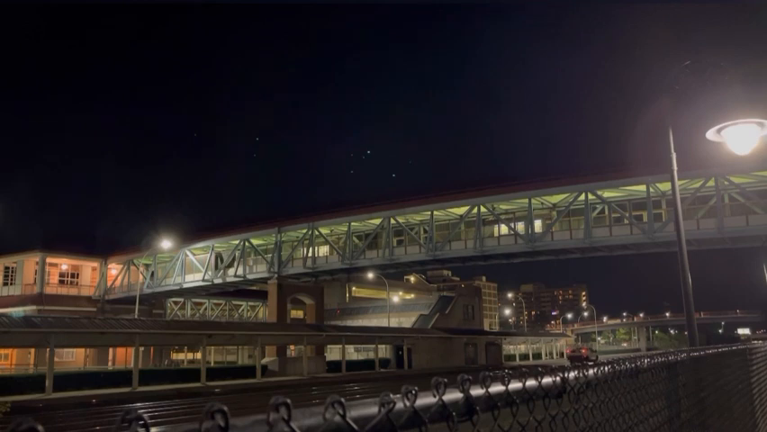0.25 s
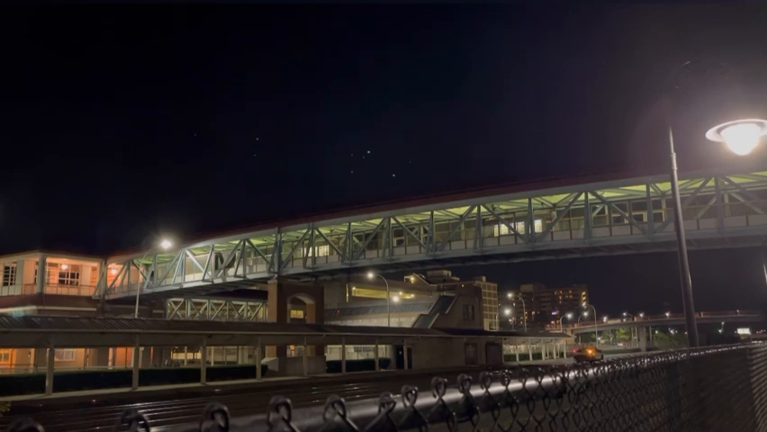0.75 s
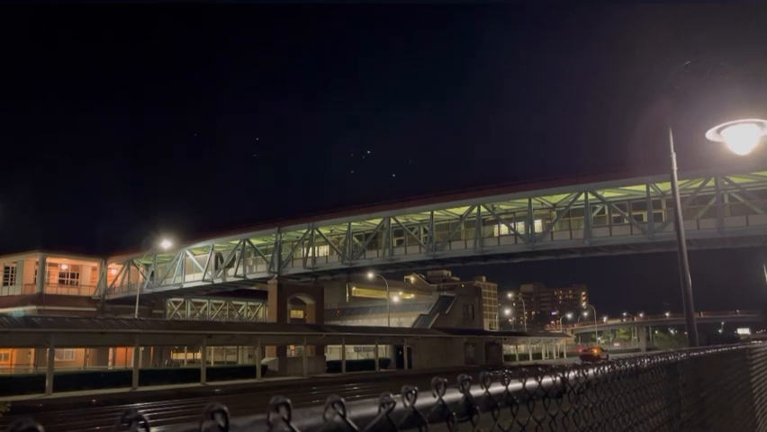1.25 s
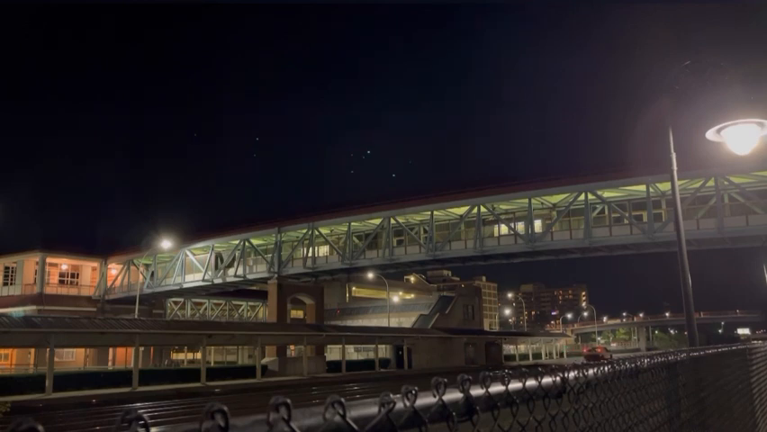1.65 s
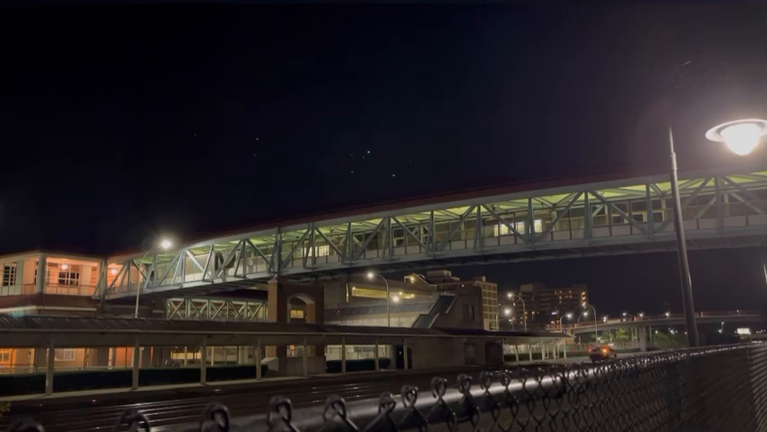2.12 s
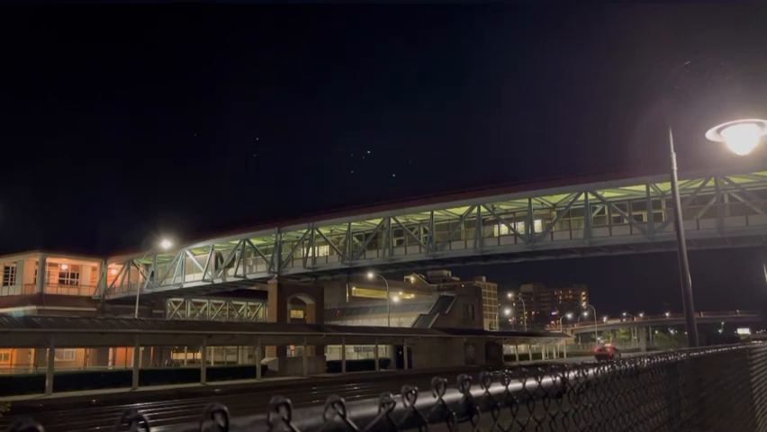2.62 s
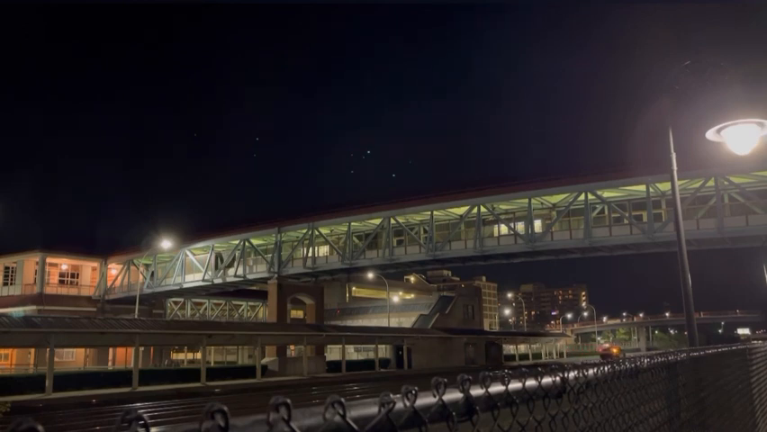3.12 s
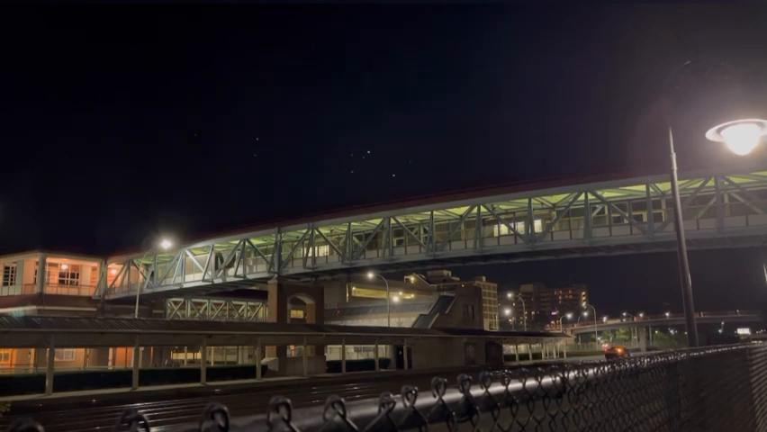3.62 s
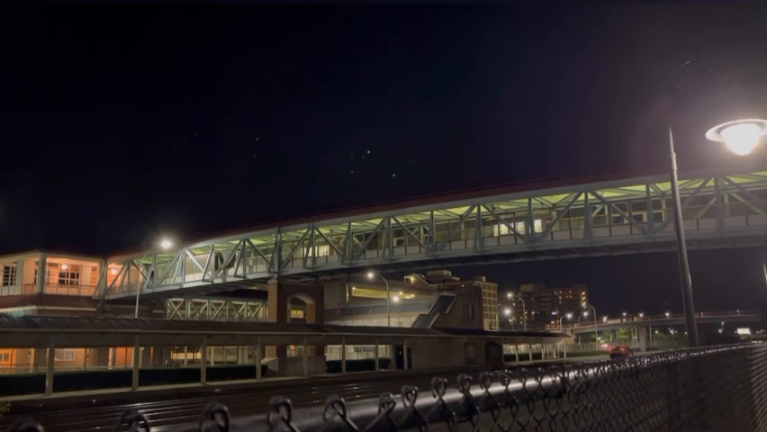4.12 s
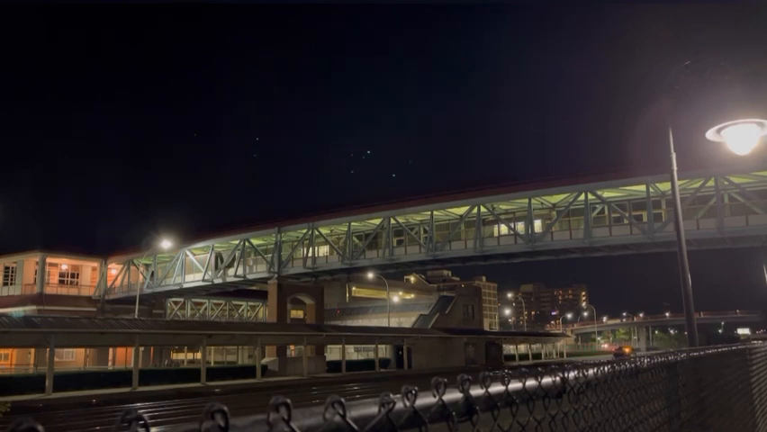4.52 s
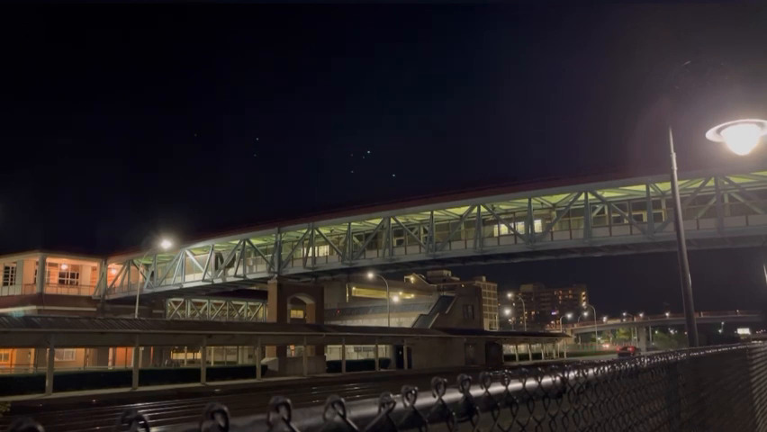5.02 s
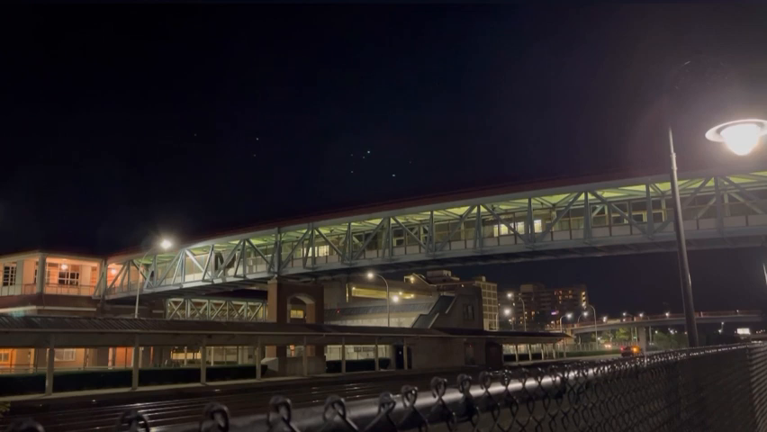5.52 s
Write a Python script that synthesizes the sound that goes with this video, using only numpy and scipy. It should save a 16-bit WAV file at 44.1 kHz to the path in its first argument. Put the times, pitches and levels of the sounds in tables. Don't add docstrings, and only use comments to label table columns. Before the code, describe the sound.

Night insects buzz and chirp steadily above a deep pulsing diesel rumble and soft town hum, with one sharp woody snap near the end.

```python
import sys
import numpy as np
from scipy import signal
from scipy.fft import rfft, irfft, next_fast_len
from scipy.io import wavfile
from scipy.ndimage import uniform_filter1d

SR = 44100
rng = np.random.default_rng(int(sys.argv[2]) if len(sys.argv) > 2 else 0)


def master(y):
    cut = np.clip(np.atleast_2d(y).T, -1, 1)
    pcm = np.round(cut * 32767)
    wavfile.write(sys.argv[1], SR, pcm.astype(np.int16))


def how_loud(loudness_db):
    steps = np.asarray(loudness_db, float) / 20
    return 10 ** steps


N = 253575
TIME = np.arange(N) / SR
FFT_SIZE = next_fast_len(N)
HZ = np.maximum(np.arange(FFT_SIZE // 2 + 1) * SR / FFT_SIZE, 1)

# t/s, level/dB
KATYDID_PACE = [(.056, -56.5), (.441, -50), (0.841, -52), (1.225, -52.5), (1.606, -54.5), (1.984, -52),
                (2.374, -53), (2.757, -54), (3.136, -50.5), (3.526, -54.5), (3.919, -54.5), (4.302, -51),
                (4.691, -52.5), (5.079, -54), (5.464, -52), (5.85, -56)]
STROKE_JITTER_S, STROKE_JITTER_DB = .002, 1.3
BUSH_LAG_MS, BUSH_LEAD_RAD = .33, -.62
WING_EDGE = signal.butter(10, 11800, fs=SR, output="sos")

# t of the middle one/s, level/dB, crescendo/(dB per syllable)
CRICKET_CHIRPS = [(.292, -51, 2.5), (.682, -52.7, 2.5), (1.144, -50.5, 1.3), (1.593, -51, 3),
                  (2.004, -50.5, -0.5), (2.426, -51, 0.7), (2.805, -52.5, 2), (3.337, -50, 1.5),
                  (3.827, -52.5, 3), (4.277, -51.5, 2.7), (4.698, -51, 1.1), (5.113, -51.5, 3.2),
                  (5.576, -51, 1.1)]
GAP_BEFORE_S, GAP_AFTER_S = 0.0391, 0.042
# t/s, level/dB
SECOND_CRICKET = [(.167, -65), (.207, -61), (.464, -57), (.5, -57), (.587, -69), (.94, -63), (1.251, -55.5),
                  (1.663, -55), (2.904, -68), (3.132, -58), (3.177, -58), (3.217, -59), (3.966, -60),
                  (4.117, -63), (4.356, -56), (4.395, -56), (4.801, -60), (5.205, -56.5), (5.444, -58),
                  (5.477, -56), (5.706, -59), (5.742, -61)]

TRILL_END_S, TRILL_PER_S, TRILL_START = 2.93, 56.22, 0.39
PHRASE_S, PHRASE_FIRST_S = .2685, 0.18
# t/s, level/dB
PHRASE_SHAPE = [(-.12, -85), (-.06, -80.5), (-.02, -75), (.03, -75.5), (.09, -81), (.14, -85)]

# t/s, length/s, f/Hz, width/Hz, level/dB
SCRAPES = [
    (0.267, 0.035, 9000, 1800, -53.5),
    (0.305, 0.047, 8800, 1500, -65),
    (3.691, 0.044, 8600, 905, -57.5),
    (3.77, 0.037, 8800, 1500, -65),
]

# t/s, peak level/dB, left-right/dB, brightest f/Hz
TICKS = [
    (1.6544, -51, -3, 8000),
    (4.0921, -41, -5, 8500),
    (4.6315, -9.5, -8, 12300),
    (4.809, -57, -3, 9000),
]
# f/Hz, peak level/dB, t60/s
TWIG_MODES = [(1435, -10.5, 0.042), (1836, -10.5, 0.039), (2280, -12, 0.0047), (2840, -10, 0.015),
              (3290, -14, 0.005), (4000, 2, 0.0085), (4880, 7, 0.0088), (5920, 17.5, 0.004),
              (6530, 16, 0.0045), (7490, 6, 0.005), (9000, 4, 0.0069), (9270, 3, 0.005),
              (10100, -21, 0.011), (11600, 7, 0.0029)]
ECHO_S, ECHO_DB = .0064, -16

# f/Hz, width/Hz, level/dB, flicker/dB
FAR_CHORUS = [(3770, 770, -71, 1.5), (4640, 460, -67.5, 1.5)]

IDLE_HZ, IDLE_DB, IDLE_WAVER_DB = 72.3, -42, .6
# t of the middle/s, length/s, firing f/Hz, peak level/dB
SURGES = [(.169, 0.61, 72.8, -33), (0.779, 0.32, 75.9, -39), (1.298, 3, 72.4, -40.5),
          (1.706, 0.67, 77.2, -41.5), (2.027, 1.03, 81.6, -36), (2.251, 0.41, 76.3, -41.5),
          (2.473, 0.36, 75.5, -31.5), (2.929, 0.38, 74.6, -31.5), (3.133, 0.67, 81.8, -40.5),
          (3.627, 1.12, 76.9, -33.5), (3.993, 0.62, 75.1, -42.5), (5.061, 0.54, 77.7, -34.5),
          (5.213, 2.7, 75.5, -45.5), (5.302, 2.6, 72.12, -40.5)]
ROUGH_HZ, ROUGH_WIDTH_HZ, ROUGH_DB = 76.5, 13, -50
# f/Hz, width/Hz, level/dB
DIESEL_DRONES = [(57, 13.7, -44.5), (109.4, 19.6, -47.5), (145.6, 4.3, -56.5)]

# f/Hz, density level/(dB per Hz)
TOWN_SPECTRUM = [(15, -10), (28, -25), (53, -13), (86, -6.5), (194, -17), (310, -21.5), (570, -24.5),
                 (773, -21.5), (1600, -37), (3200, -47), (4160, -74), (7040, -120)]
# t/s, level/dB
TOWN_SWELL = [(0, -55), (2.9, -54.5), (4.5, -56.5), (5.75, -54.5)]
# f/Hz, density level/(dB per Hz)
AIR_SPECTRUM = [(2000, 3), (3000, -11.5), (4200, 2.5), (5200, 0.5), (6200, -1), (7300, -10.5), (8000, -2.5),
                (9200, -31), (11500, -11), (13000, -40)]
# nearest t/s, level/dB, time to fade 10 dB/s, f/Hz, width/Hz
CARS = [
    (.45, -54, 0.8, 777.5, 30),
    (.95, -59, 0.4, 965, 150),
    (1.4, -58, 0.07, 726, 100),
    (2.45, -55, 0.7, 873, 200),
    (3.1, -53.5, .5, 780, 160),
    (5.35, -66, 0.2, 800, 120),
]

# f/Hz, coherence/(0-1), right leads/rad, left-right/dB
FIELD_COHERENCE = [(60.4, 0.95, 0.15, 0), (140, 0.99, 0.31, -1.5), (304, 0.57, 0.0097, -1.2),
                   (1080, 0.45, 0.22, -2), (1650, 0.16, 0, -1.5), (3050, 0.76, 1, -2),
                   (5970, 0.53, 0.75, -4), (7250, 0.86, 0.4, -2.5), (8300, 0.3, 0.67, -2),
                   (8800, 0.8, .05, -7), (11900, 0.7, .05, 9)]


def katydid():
    clicks, beats = teeth(1500, spread_db=3.5), wing_strokes()
    wing = resonate(clicks, (11000, 1000), (10900, 1600))
    wing += .3 * resonate(clicks, (10100, 800), (10000, 1300))
    wing = signal.sosfilt(WING_EDGE, wing)
    edge = resonate(clicks, (12200, 900), (11500, 1500))
    closing = rms_one(wing + .2 * how_loud(4.5 * drift(5)) * edge)
    opening = rms_one(resonate(clicks, (11300, 850), (9100, 2100)))
    closing_shape = [(-.022, -50), (-.013, -10.5), (-.002, -4), (.007, -8), (.012, -9), (.02, -32)]
    opening_shape = [(.006, -26), (.013, -20.5), (.022, -19), (.035, -31), (.045, -17)]
    song = closing * strokes(beats, closing_shape) + opening * strokes(beats, opening_shape)

    overtones = rms_one(resonate(clicks, (14400, 500), (14400, 800))) * how_loud(-10 + 6 * drift(5))
    lower = rms_one(resonate(clicks, (13000, 600), (13000, 900))) * how_loud(3.5 * drift(7))
    overtones += np.interp(TIME, [1.5, 3], [1.4, 2.8]) * lower
    song += how_loud(-29.5) * overtones * strokes(beats, [(-.015, -20), (0, 7), (.012, -20)])

    snap = np.zeros(N)
    snap[[round((s + .006) * SR) for s, db in beats]] = how_loud(-35 + 4.0 * rng.standard_normal(len(beats)))
    song += resonate(snap, (11700, 1500), (11500, 2500))

    rasp_noise = rng.standard_normal(N)
    blur = resonate(rasp_noise, (10500, 1300), (10900, 1700)) + 0.17 * resonate(rasp_noise, (8850, 500))
    song += how_loud(-70.5 + 1.6 * drift(3.3)) * rms_one(signal.sosfilt(WING_EDGE, blur))
    fence_echo = how_loud(-15) * place(np.roll(song, 90), 1, -.2, .5)
    return place(song, .01, BUSH_LAG_MS, BUSH_LEAD_RAD) + fence_echo


def wing_strokes():
    pace = np.transpose(KATYDID_PACE)
    marks = np.arange(len(KATYDID_PACE))
    count = np.arange(5 * len(marks) - 6) / 5
    jitter = rng.standard_normal((len(count), 2)) * [STROKE_JITTER_S, STROKE_JITTER_DB]
    return np.transpose([np.interp(count, marks, column) for column in pace]) + jitter


def teeth(per_s, spread_db):
    passed = np.floor(np.cumsum(per_s / SR * how_loud(2.0 * drift(150))))
    struck = np.diff(passed, prepend=0) > 0
    return struck * how_loud(spread_db * rng.standard_normal(N)) * rng.choice([-1, 1], N)


def field_cricket():
    threes = []
    for s, db, rise_db in CRICKET_CHIRPS:
        threes += [(s - GAP_BEFORE_S, db - rise_db), (s, db), (s + GAP_AFTER_S, db + rise_db)]
    near = place(how_loud(0.26) * syllables(threes, 4800), -4.0, -0.033, 1.0)
    behind = place(how_loud(-3) * syllables(SECOND_CRICKET, 4700), -2, .01, .7)
    return near + behind


def syllables(events, middle_hz):
    middles = np.array(events)[:, 0]
    nearest = np.searchsorted((middles[1:] + middles[:-1]) / 2, TIME)
    glide_hz = 13000 * np.clip(TIME - middles[nearest], -.012, .006)
    hz = middle_hz - glide_hz + 40 * drift(118)
    tone = np.sqrt(2) * np.sin(2 * np.pi * np.cumsum(hz) / SR) * how_loud(1.7 * drift(200))
    shape = [(-.016, -28), (-.011, -16), (-.005, -6.5), (0.0, 0), (.005, -5.5), (.009, -7.5), (.013, -21)]
    return tone * strokes(events, shape)


def ground_crickets():
    stroke = (TIME * TRILL_PER_S - TRILL_START) % 1
    gate = 1.3 + uniform_filter1d(1. * (stroke < .48), size=60)
    file = rng.standard_normal(N)
    trill = resonate(file, (8240, 150), (8170, 450))
    trill += .6 * resonate(file, (8030, 200), (8030, 400))
    trill += .25 * resonate(file, (8860, 120), (8860, 300))
    trill = how_loud(-78.5) * rms_one(trill) * gate * np.clip((TRILL_END_S - TIME) / .01, 0, 1)

    starts = PHRASE_FIRST_S + PHRASE_S * np.arange(-1, 22)
    level = strokes(zip(starts, 0.89 * rng.standard_normal(len(starts))), PHRASE_SHAPE) + how_loud(-83.5)
    band = np.exp(-((HZ - 6800) / 330) ** 4) + 0.29 * peak(6640, 770)
    return place(trill, -.5, -0.0063, 0.91) + how_loud(4.0) * level * far_field(band)


def scrapes():
    out, clicks = np.zeros(N), teeth(2600, spread_db=2.5)
    for s, length, hz, width_hz, db in SCRAPES:
        shape = np.array([(0, -14), (.08, -3), (.55, 0), (1.0, -5), (1.4, -20)]) * [length, 1]
        wing = resonate(clicks, (hz, width_hz), (hz, 2 * width_hz), (hz, 2 * width_hz))
        out += strokes([(s, db)], shape) * rms_one(wing)
    return place(out, .1, BUSH_LAG_MS, BUSH_LEAD_RAD)


def ticks():
    out = np.zeros((2, N))
    mode_hz, mode_db, t60_s = np.transpose(TWIG_MODES)
    span = 6000
    age = np.arange(span) / SR
    for s, level_db, pan_db, top_hz in TICKS:
        crack_level = np.interp(age, [0, .0007, .0017, .0019, .003, .004], [0, 1, 1, .4, .3, 0])
        cracks = rng.choice([-1, 1], span) * crack_level
        widths = np.log(1000) / np.pi / t60_s
        rings = np.array([resonate(cracks, band) for band in zip(mode_hz, widths)])
        modes = rings / np.max(np.abs(rings), axis=1, keepdims=True) * how_loud(mode_db)[:, None]
        shade = how_loud(pan_db / (1 + ((mode_hz - 6000) / 2500) ** 2))
        bright = mode_hz > 8500
        left = np.roll((shade * ~bright) @ modes, 2) + (shade * bright) @ modes
        right = ~bright @ modes + np.roll(bright @ modes, 15)
        body = np.array([left, right])
        echo = np.roll(resonate(body, (9500, 7000)), round(ECHO_S * SR), axis=1)
        body += how_loud(ECHO_DB) * echo * how_loud([[4], [0]])
        tail = signal.sosfilt(WING_EDGE, resonate(rng.standard_normal((2, span)), (8500, 3500)))
        tail *= how_loud(-29 - 60 * age / .22) * (age > .003)
        dull = signal.butter(6, top_hz, fs=SR, output="sos")
        at = round(s * SR)
        out[:, at:at + span] += how_loud(level_db) * signal.sosfilt(dull, body / np.max(np.abs(body)) + tail)
    return out


def far_crickets():
    return sum(how_loud(db + flicker_db * drift(36)) * far_field(peak(hz, width_hz))
               for hz, width_hz, db, flicker_db in FAR_CHORUS)


def diesels():
    tone = how_loud(IDLE_DB + IDLE_WAVER_DB * drift(0.58)) * firing(IDLE_HZ, 0)
    for s, length, hz, db in SURGES:
        tone += how_loud(db) * swell(s, length) * firing(hz, s)
    rough = how_loud(ROUGH_DB) * far_field(peak(ROUGH_HZ, ROUGH_WIDTH_HZ))
    drone_gain = sum(how_loud(db) * peak(hz, width) / np.sqrt(width) for hz, width, db in DIESEL_DRONES)
    return place(tone, -0.96, 0, 0.049) + rough + how_loud(-44.0) * far_field(drone_gain)


def swell(middle_s, length_s):
    return np.cos(np.pi * np.clip((TIME - middle_s) / length_s, -.5, .5)) ** 2


def firing(hz, from_s):
    turn = 2 * np.pi * hz * (TIME - from_s)
    return np.sqrt(2) * (np.cos(turn) + how_loud(-20.5) * np.sin(2 * turn))


def town():
    swell_db = np.interp(TIME, *np.transpose(TOWN_SWELL))
    hum = how_loud(swell_db + 12.5 + .5 * drift(1.65)) * far_field(how_loud(in_pitch(TOWN_SPECTRUM)[0]))
    road = far_field(peak(850, 2000))
    for s, db, fade_s, hz, width_hz in CARS:
        tyres = rms_one(resonate(road, (hz, width_hz), (hz, width_hz)))
        hum += how_loud(db - 10 * ((TIME - s) / fade_s) ** 2) * tyres
    return hum + how_loud(-65.5) * far_field(how_loud(in_pitch(AIR_SPECTRUM)[0]))


def far_field(gain):
    shared, own, pan = port_pair()
    phase = np.exp(2j * np.pi * rng.random((2, len(HZ))))
    left, other = phase * np.sqrt(rng.exponential(size=(2, len(HZ)))) * gain
    spectra = np.array([left, shared * left + own * other]) * pan
    return rms_one(irfft(spectra, FFT_SIZE)[:, :N])


def port_pair():
    alike, lead, pan_db = in_pitch(FIELD_COHERENCE)
    alike = np.clip(alike, 0, 1)
    return alike * np.exp(1j * lead), np.sqrt(1 - alike ** 2), how_loud(np.array([pan_db, -pan_db]) / 2)


def place(x, pan_db, lag_ms, lead_rad):
    turn = np.exp(1j * (lead_rad - 2 * np.pi * HZ * lag_ms / 1000))
    right = irfft(rfft(x, FFT_SIZE) * turn, FFT_SIZE)[:N]
    return np.array([x * how_loud(pan_db / 2), right * how_loud(-pan_db / 2)])


def resonate(x, *bands):
    for hz, width_hz in bands:
        r = np.exp(-np.pi * width_hz / SR)
        poles = [1, -2 * r * np.cos(2 * np.pi * hz / SR), r * r]
        x = signal.lfilter([(1 - r * r) / 2, 0, (r * r - 1) / 2], poles, x + 1e-18)
    return x


def strokes(events, shape):
    out = np.zeros(N)
    s, shape_db = np.transpose(shape)
    for at, level_db in events:
        near = slice(max(int((at + s[0]) * SR), 0), int((at + s[-1]) * SR))
        out[near] += how_loud(level_db + np.interp(TIME[near] - at, s, shape_db))
    return out


def peak(hz, width_hz):
    return 1 / (1 + ((HZ - hz) / (width_hz / 2)) ** 2)


def drift(rate):
    r = np.exp(-80 * np.pi * rate / SR)
    slow = signal.lfilter([1], [1, -2 * r, r * r], rng.standard_normal(N // 40 + 2002))[2000:]
    return np.interp(np.arange(N) / 40, np.arange(len(slow)), rms_one(slow))


def in_pitch(rows):
    hz, *columns = np.transpose(rows)
    return [np.interp(np.log(HZ), np.log(hz), column) for column in columns]


def rms_one(x):
    return x / np.sqrt(np.mean(x ** 2) + 1e-20)


def scene():
    insects = katydid() + field_cricket() + ground_crickets() + scrapes() + far_crickets()
    return insects + ticks() + diesels() + town()


def top_cut(x):
    return signal.sosfilt(signal.butter(12, 14600, fs=SR, output="sos"), x)


def record(dry):
    x = signal.sosfilt(signal.butter(2, 38, "high", fs=SR, output="sos"), dry)
    x = signal.sosfilt(signal.butter(6, 13500, fs=SR, output="sos"), x)
    return top_cut(x)


dry = scene()
out = record(dry)
master(out)
```